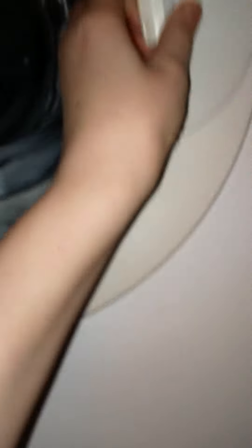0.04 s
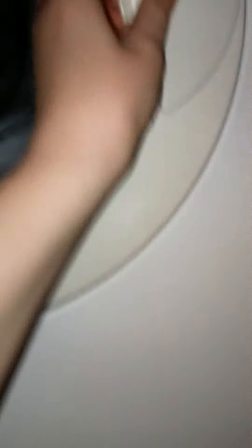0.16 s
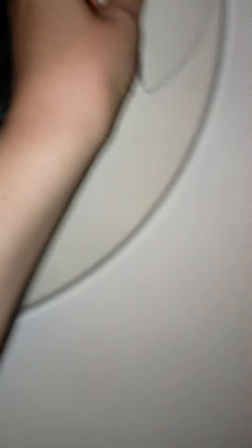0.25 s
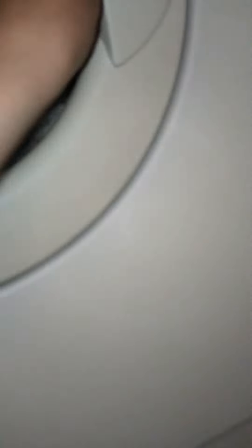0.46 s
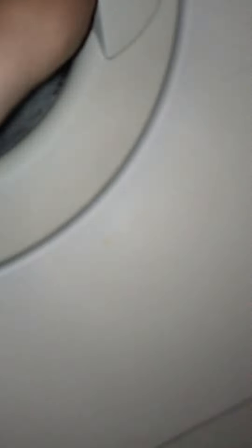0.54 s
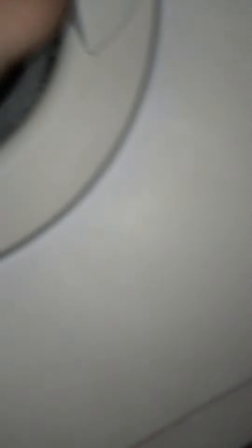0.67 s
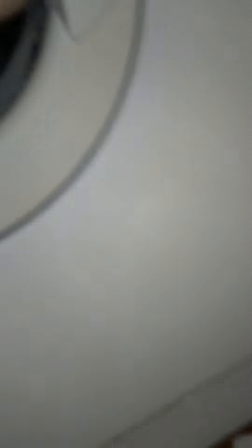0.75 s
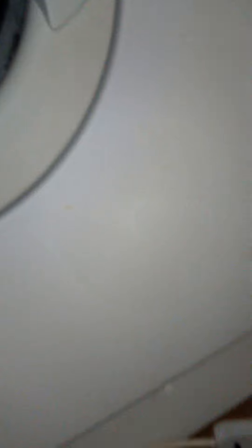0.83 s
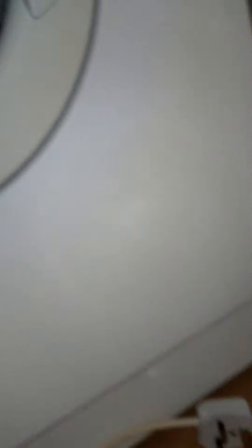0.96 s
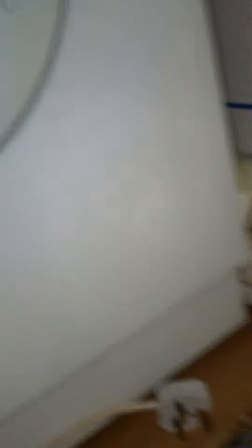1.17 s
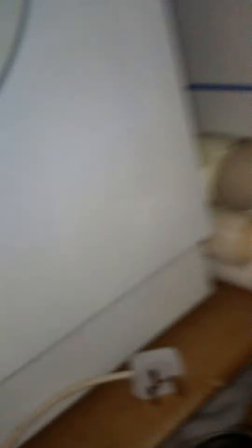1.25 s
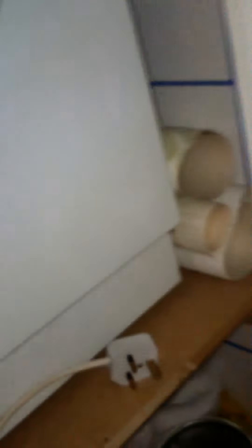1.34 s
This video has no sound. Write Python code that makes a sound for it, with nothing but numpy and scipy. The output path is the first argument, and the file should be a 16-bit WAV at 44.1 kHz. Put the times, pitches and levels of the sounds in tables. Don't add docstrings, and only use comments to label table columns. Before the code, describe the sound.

Close to a small, slightly dull microphone in a quiet indoor room, a washing machine door clicks, thumps and slams shut; its hollow cabinet booms, the catch rattles back, and faint movement and creaking follow.

```python
import sys
import numpy as np
from scipy import signal
from scipy.fft import rfft, irfft
from scipy.io import wavfile
from scipy.ndimage import uniform_filter1d, map_coordinates

SR = 44100
rng = np.random.default_rng(int(sys.argv[2]) if len(sys.argv) > 2 else 0)


def waveform_to_disk(signal):
    frames = np.transpose(np.atleast_2d(signal))
    scaled = np.clip(frames, -1, 1) * 32767
    samples = np.round(scaled).astype(np.int16)
    wavfile.write(sys.argv[1], SR, samples)


def level_to_linear(level):
    exponent = np.asarray(level, float) / 20
    return 10 ** exponent


N = 61739

# f/Hz, level/dB
HISS_COLOUR = [(15, -33), (25, 9.5), (120, -4), (385, -19), (1000, -25.5), (1790, -24), (2340, -27),
               (3210, -29), (14200, -36)]
# t/s, level/dB
HISS_LEVEL = [(0, 4), (.55, 5), (.8, 4), (.95, 1.5), (1.4, 6)]
# t/s, level/dB
GRIP = [
    (0, -63),
    (.012, -63),
    (.027, -59),
    (.04, -60),
    (.08, -47.5),
    (.125, -79),
    (.14, -100),
]
# f/Hz, level/dB
RUB_COLOUR = [(200, -18), (400, 5.5), (700, -7), (950, -3.5), (1500, -14), (3000, -25), (15000, -53)]
# t/s, level/dB, contact/s, freedom/0-1
PUSHES = [(0.0, -38.5, .002, 0.06), (.044, -15.5, 0.013, 0.31), (0.084, -11.5, 0.0068, 0.06),
          (0.098, -25, 0.0049, 0.39), (0.19, -28, 0.0019, 0.5), (0.22, -13, 0.0023, 1),
          (0.31, -28.5, 0.0041, 0.4), (0.489, -40.5, 0.0052, 1), (0.742, -45, 0.005, 0.77),
          (0.919, -53, 0.0031, 0.3), (1.153, -38.5, 0.011, 0.19), (1.278, -41, .004, .2),
          (1.228, -29.5, 0.0098, 0.15), (1.354, -38.5, 0.0017, 0.17)]
# f/Hz, level/dB, t60/s
CABINET_MODES = [(42.4, -21, 1), (63.6, -7.5, 0.44), (83.5, 2.5, 0.18), (87.34, -2.5, 0.3),
                 (117.4, -26, 0.5), (158.2, -10.5, .45), (174.9, -21.5, .9), (190, -16.5, 0.99)]
# (f/Hz, level/dB, t60/s)
HANDLE = [(.0413, -35.5, 0.001), (.0436, -34, 0.00082), (.05, -46, 0.00076)], [(874, -11, 0.1),
          (1060, -4.5, 0.041), (2400, 7.5, 0.032), (3456, -3.5, .02), (4460, -10, .02),
          (5320, -10.5, 0.016), (7700, -9.5, 0.021), (2857, -13, 0.045)]
# (f/Hz, level/dB, t60/s)
CATCH = [(.4248, -43.5, 0.00051), (.4297, -39.5, 0.00035), (.4375, -48, 0.00057), (.449, -51, .0006),
         (.469, -57, .001)], [(1028, 0, 0.06), (1380, -2.5, 0.053), (1870, -2, 0.038), (2074, -2, 0.036),
         (2322, 3, 0.04), (3380, -8.5, 0.12), (3600, -5, 0.069), (4050, -2.5, 0.028), (10300, -12, .02),
         (800, -16, 0.082)]
# t/s, bright snap level/dB, plastic ring level/dB, scrape length/s, ring centre f/Hz
CLICKS = [(0.0428, -41, -46, 0.0059, 3280), (0.19, -70, -52, .001, 2400),
          (0.194, -45.5, -53, 0.00062, 8000), (.198, -45.5, -44, .002, 2450),
          (0.2075, -40, -50, 0.002, 1800), (.2135, -59, -36.5, 0.0013, 1640), (.2195, -59, -46, .001, 1430),
          (0.2649, -42, -52, 0.0012, 4200), (0.269, -56, -66, 0.0037, 9000), (0.28, -56, -67, 0.0044, 8000),
          (0.32, -73, -57.5, 0.001, 3870), (0.334, -68, -54, .002, 2830),
          (0.3565, -72, -54.5, 0.0015, 2540), (0.389, -64, -58.5, .002, 4120),
          (0.3936, -54.5, -51.5, 0.0048, 970), (0.406, -63, -63.5, 0.0037, 3600),
          (0.425, -54.5, -53.5, .002, 3970), (0.4302, -45.5, -52.5, 0.0034, 2270),
          (0.435, -66, -45, 0.0041, 1270), (0.445, -65, -52.5, 0.0066, 2530),
          (0.46, -68, -49, 0.0025, 1070), (0.47, -75.5, -62, 0.0077, 2400), (0.484, -98, -64, 0.0037, 2000),
          (1.257, -103, -58.5, 0.025, 1050), (1.271, -68, -60, 0.0047, 7150),
          (1.2954, -63, -53.5, 0.0022, 2000), (1.299, -76, -52, 0.0058, 750), (1.341, -77, -56, 0.013, 637)]
# f/Hz, level/dB
SNAP_COLOUR = [(500, -36), (1800, 1.5), (3000, -3), (5000, -3.5), (7000, -5.5), (9500, -2), (12000, -9.5),
               (15000, -2)]
# t/s, level/dB, dulling/(dB per kHz)
BLOWS = [
    (.043, -34, 11.5),
    (0.057, -42, 16),
    (.072, -43, 14),
    (0.2071, -16.5, -0.4),
    (0.2127, -21, 3),
    (.252, -38, 6),
    (.27, -34, 9),
    (0.429, -46, 22),
    (1.2975, -58, 1.5),
    (1.352, -55, 6),
]
# f/Hz, level/dB, t60/s
DOOR_MODES = [(298.8, -11.5, 0.33), (348, -16.5, 0.12), (361.6, 1.5, 0.11), (678, -19.5, 0.26),
              (810, -11.5, 0.17), (932.5, -6, 0.049), (988, -1.5, 0.048), (1050, 0.5, 0.028),
              (1117, -3, 0.037), (1160, -32, 0.056), (1230, -33, 0.022), (1340, -47, 0.058),
              (1700, -11, 0.036)]
# f/Hz, level/dB
RATTLE_COLOUR = [(220, -28), (300, -1), (390, -5.5), (520, -18.5), (1000, -12), (1500, -20), (2500, -32),
                 (5000, -42)]
# f/Hz, t60/s
ROOM_DECAY = [(300, 0.36), (1000, 0.19), (10000, 0.15)]
# t/s, slip rate f/Hz, fundamental level/dB, overtone level/dB
SEAL = [
    (.128, 289.8, -59, -74),
    (.14, 288.5, -60, -54.5),
    (.152, 317, -38.5, -53.5),
    (.17, 305.5, -39, -50.5),
    (.18, 307, -40, -48),
    (.186, 349, -33, -58),
    (.197, 396, -34, -69),
    (.203, 400, -43, -80),
]
SEAL_HARMONICS = [1, 5, -23]
# f/Hz, level/dB
BOOM_COLOUR = [(15, -32), (25, -4), (75, 6), (177, -1.5), (262, -20), (368, -15.5), (492, -33.5),
               (750, -24), (1200, -36), (1560, -59), (2640, -120)]
# t/s, level/dB
FLOOR_LEVEL = [
    (1.0, -59),
    (1.11, -72),
    (1.17, -66),
    (1.21, -61.5),
    (1.29, -49.5),
    (1.34, -54),
    (1.4, -50),
]
# f/Hz, level/dB
FLOOR_COLOUR = [(15, -41), (25, -39), (52, 17), (102, -14), (236, -3), (390, 0.5), (700, -16), (910, -23),
                (1540, -120)]
# t/s, level/dB
CLOTH_EFFORT = [
    (0.95, -101),
    (0.958, -71.5),
    (1.094, -56.5),
    (1.194, -61),
    (1.292, -57.5),
    (1.298, -60),
    (1.33, -60),
    (1.4, -77),
]
# f/Hz, level/dB
WEAVE_COLOUR = [(200, -43), (600, -1), (1400, 3), (2200, 3), (4500, -3), (5500, -12.5), (9000, -10),
                (15000, -17)]
# t/s, f/Hz, level/dB
CREAK = [
    (1.078, 384.7, -71),
    (1.088, 383.6, -61),
    (1.14, 391, -64),
    (1.15, 392.7, -57),
    (1.254, 390.2, -56),
    (1.266, 390.2, -73),
    (1.278, 389.6, -47.5),
    (1.326, 399, -54.5),
    (1.34, 407, -77.5),
]
# t/s, level/dB
SQUEAK = [
    (1.09, -95),
    (1.105, -66.5),
    (1.14, -76),
    (1.155, -87),
    (1.26, -77),
    (1.275, -71),
    (1.3, -91),
]
# f/Hz, level/dB
FIBRE_COLOUR = [(6400, -58), (6850, -5), (7300, -53), (8300, -45), (8750, 0), (9200, -60)]
# f/Hz, chance/0-1
SPLIT_CHANCE = [(4000, 0.00086), (5200, 0.29), (7500, 0.71), (13500, 1), (14500, 0.24)]


def unit(x):
    return x / np.sqrt(np.mean(x ** 2) + 1e-20)


def along(points, hz):
    f, value = np.transpose(points)
    return np.interp(np.log(hz + 1), np.log(f + 1), value)


def curves(rows):
    s, *columns = np.transpose(rows)
    t = np.arange(N) / SR
    return [np.interp(t, s, column) for column in columns]


def wobble(rate, count=N):
    knots = rng.standard_normal(int(count * rate / SR) + 4)
    return map_coordinates(knots, [np.arange(count) * rate / SR])


def noise(response):
    spectrum = rfft(rng.standard_normal(N + 1))
    hz = np.fft.rfftfreq(N + 1, 1 / SR)
    return unit(irfft(spectrum * response(hz), N + 1)[:N])


def coloured(points):
    return noise(lambda hz: level_to_linear(along(points, hz)))


def since(s):
    t = np.arange(N) / SR - s
    return np.maximum(t, 0), t > 0


def ring(modes, s, db, rise_s, free=1, rough_db=0):
    t = np.arange(SR // 2) / SR
    flutter_db = rough_db * np.tanh(t / 0.0098)
    sound = 0
    for hz, mode_db, t60 in modes:
        level = level_to_linear(mode_db - 60 * t / (free * t60) + flutter_db * wobble(hz / 8, count=t.size))
        drift = 0.12 * flutter_db * wobble(hz / 10, count=t.size)
        sound = sound - level * np.sin(2 * np.pi * hz * t + drift)
    attack = 1 - np.exp(-t / rise_s)
    fade_out = np.cos(np.pi * t)
    return np.pad(level_to_linear(db) * attack * fade_out * sound, (round(s * SR), N))[:N]


def hiss():
    return level_to_linear(-57 + curves(HISS_LEVEL)[0] + 0.77 * wobble(8.2)) * coloured(HISS_COLOUR)


def grip():
    return coloured(RUB_COLOUR) * level_to_linear(curves(GRIP)[0] + 1.7 * wobble(80))


def cabinet():
    return sum(ring(CABINET_MODES, *push, rough_db=0.6) for push in PUSHES)


def scraped(strikes, modes):
    return sum(ring(modes, *strike, rough_db=4.0) for strike in strikes)


def plastic_ring(centre_hz):
    spread_hz = 0.77 * centre_hz

    def resonance(f):
        damping = 1j * f * spread_hz
        return (f * spread_hz / (centre_hz * centre_hz - f * f + damping)) ** 2
    return noise(resonance)


def latch():
    out = scraped(*HANDLE) + scraped(*CATCH)
    snap = coloured(SNAP_COLOUR)
    grit = level_to_linear(1.2 * wobble(550))
    for s, snap_db, ring_db, length_s, centre_hz in CLICKS:
        t, on = since(s)
        after = np.maximum(t - length_s, 0)
        scrape = grit * level_to_linear(-60 * after / 0.056)
        tail = level_to_linear(-16.5 - 60 * t / 0.089)
        body = level_to_linear(snap_db) * snap + level_to_linear(ring_db) * plastic_ring(centre_hz)
        out += on * (scrape + tail) * body
    return out


def door():
    out, shake = 0, 0
    for s, db, dull in BLOWS:
        modes = [(hz, mode_db - dull * hz / 1000, t60) for hz, mode_db, t60 in DOOR_MODES]
        out = out + ring(modes, s, db, 0.00064, rough_db=2.5)
        t, on = since(s)
        shake = shake + on * level_to_linear(db - 21 - 60 * t / 0.39)
    return out + shake * coloured(RATTLE_COLOUR)


def room(x):
    hz, t, z = signal.stft(rng.standard_normal(SR // 2), SR, nperseg=256)
    decay = level_to_linear(-60 * t / along(ROOM_DECAY, hz)[:, None])
    tail = signal.istft(z * decay, SR, nperseg=256)[1]
    delayed = np.pad(x, (300, 0))
    return signal.fftconvolve(delayed, tail / np.linalg.norm(tail))[:N]


def seal():
    hz, db, upper_db = curves(SEAL)
    phase = 2 * np.pi * np.cumsum(hz * (1 + 0.0382 * wobble(113))) / SR
    upper = level_to_linear(-1.5) * coloured(RUB_COLOUR) * (1 + 0.57 * np.sin(phase))
    for k, harmonic_db in enumerate(SEAL_HARMONICS):
        upper += level_to_linear(harmonic_db + 1.5 * wobble(60)) * np.sin((k + 2) * phase + k)
    squeezed = since(SEAL[0][0])[1] & ~since(SEAL[-1][0])[1]
    return (level_to_linear(db) * np.sin(phase) + level_to_linear(upper_db) * upper) * squeezed


def drum():
    t, _ = since(0.26)
    swell = 1 - np.exp(-t / 0.022)
    return coloured(BOOM_COLOUR) * swell * level_to_linear(-27 - 60 * t / 1.164 + 1.2 * wobble(24.8))


def floor():
    return coloured(FLOOR_COLOUR) * level_to_linear(curves(FLOOR_LEVEL)[0] + 2.4 * wobble(27.07))


def cloth():
    return coloured(WEAVE_COLOUR) * level_to_linear(curves(CLOTH_EFFORT)[0] + 0.8 * wobble(25) + 0.8 * wobble(300))


def board():
    hz, db = curves(CREAK)
    phase = 2 * np.pi * np.cumsum(hz * (1 + 0.008 * wobble(41))) / SR
    return np.sin(phase) * level_to_linear(db + 1.7 * wobble(35.2))


def fibres():
    return coloured(FIBRE_COLOUR) * level_to_linear(curves(SQUEAK)[0] + 2.5 * wobble(59))


def person():
    fade_in = np.clip((np.arange(N) / SR - 0.9) / 0.16, 0, 1)
    return fade_in * (floor() + cloth() + board() + fibres())


def scene():
    near = latch() + door() + seal()
    mono = hiss() + grip() + cabinet() + near + level_to_linear(-13) * room(near) + drum() + person()
    return np.array([mono, mono])


def treble_split(x):
    hz, t, z = signal.stft(x, SR, nperseg=512)
    luck = rng.random((hz.size // 12 + 1, t.size // 8 + 1))
    luck = luck.repeat(12, axis=0).repeat(8, axis=1)[:hz.size, :t.size]
    power = uniform_filter1d(uniform_filter1d(abs(z) ** 2, size=9, axis=0), size=3, axis=1)
    level = np.sqrt(power.clip(0))
    fresh = signal.stft(rng.standard_normal(N), SR, nperseg=512)[2]
    fresh = fresh / np.sqrt(np.mean(abs(fresh) ** 2))
    parted = luck < along(SPLIT_CHANCE, hz)[:, None]
    return signal.istft(fresh * level * parted, SR, nperseg=512)[1][:N]


def band_limit(x):
    return signal.sosfilt(signal.butter(12, 15250, fs=SR, output="sos"), x)


def record(dry):
    both = dry + level_to_linear(-6.5) * treble_split(dry[0]) * [[1], [-1]]
    low_cut = signal.butter(2, 45, 'high', fs=SR, output='sos')
    top_cut = signal.ellip(12, 0.5, 60, 14300, fs=SR, output='sos')
    mix = signal.sosfilt(np.vstack([low_cut, top_cut]), both)
    return band_limit(mix)


dry = scene()
out = record(dry)
waveform_to_disk(out)
```